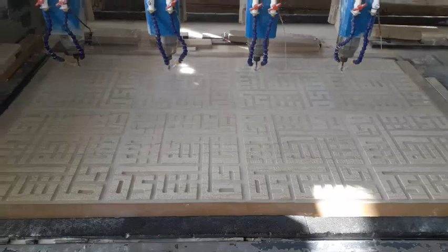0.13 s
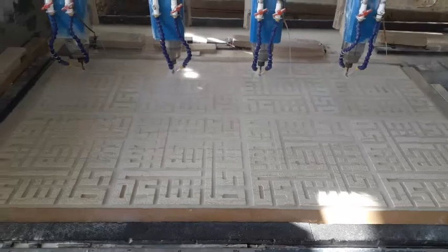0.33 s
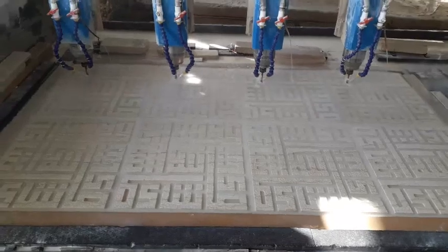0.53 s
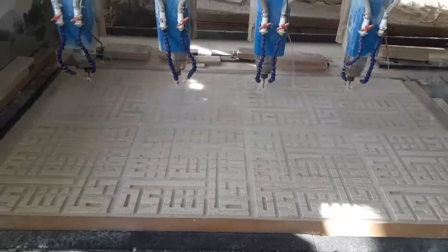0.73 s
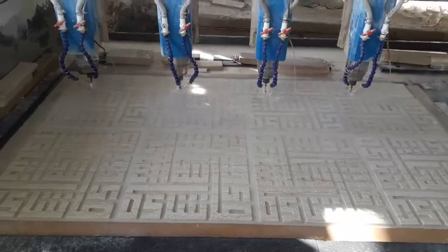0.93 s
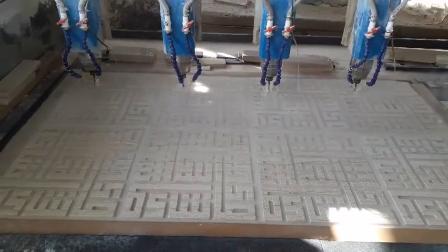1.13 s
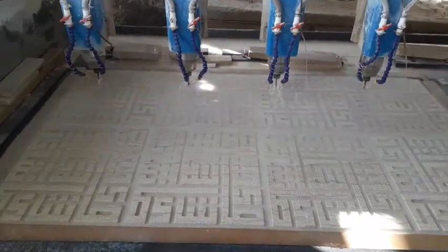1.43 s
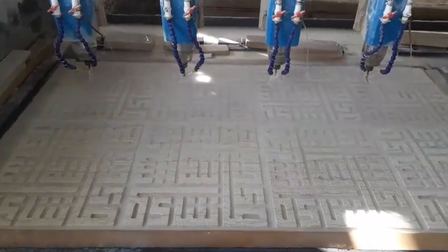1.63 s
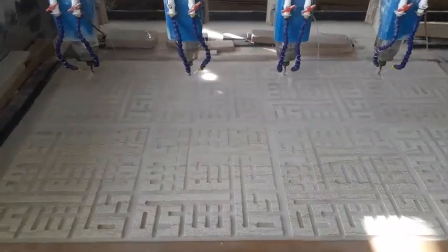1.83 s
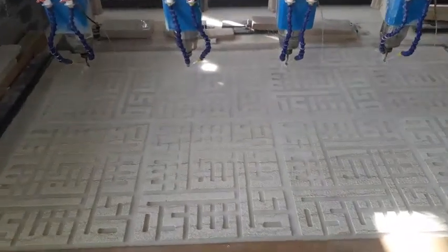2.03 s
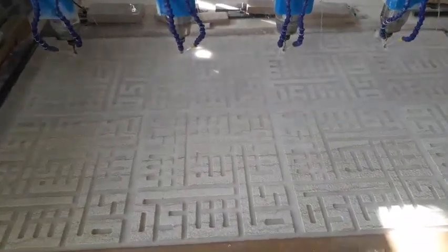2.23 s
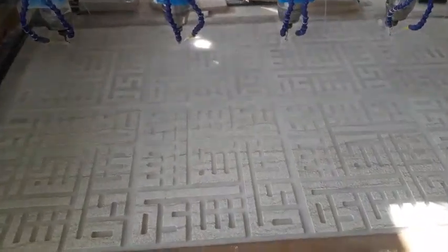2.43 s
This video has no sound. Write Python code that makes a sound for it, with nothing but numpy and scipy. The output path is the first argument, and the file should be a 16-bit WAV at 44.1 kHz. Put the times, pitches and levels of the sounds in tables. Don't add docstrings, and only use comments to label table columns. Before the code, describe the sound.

Router spindles carve stone in a workshop: three harsh grinding strokes with wavering whine and piercing ringing, separated by thinner, quieter spinning and a steady pump hum, captured nearby, abrupt at the start and with little deep bass.

```python
import sys
import numpy as np
from scipy import signal
from scipy.fft import rfft, irfft, next_fast_len
from scipy.io import wavfile
from scipy.ndimage import uniform_filter1d

SR = 44100
rng = np.random.default_rng(int(sys.argv[2]) if len(sys.argv) > 2 else 0)


def nominal_scale(level):
    x = np.asarray(level, float) / 20
    return 10 ** x


def generate_wav(signal):
    frames = np.transpose(np.atleast_2d(signal))
    scaled = np.clip(frames, -1, 1) * 32767
    pcm = np.round(scaled).astype(np.int16)
    wavfile.write(sys.argv[1], SR, pcm)


N = 114660
T = np.arange(N) / SR

SHAFT_RATES = [399.4, 401.6]


def evened(x):
    return x / np.sqrt(np.mean(abs(x) ** 2) + 1e-20)


def curve(rows, axis=1):
    rows = np.array(rows)
    return np.interp(T, rows[:, 0], rows[:, axis])


def read(points, hz):
    f, value = np.transpose(points)
    return np.interp(np.log(hz + 1), np.log(f + 1), value)


def slow(width_hz, count):
    size = next_fast_len(N // 16 + 2)
    hz = np.fft.fftfreq(size, 16 / SR)
    keep = abs(hz) < 150
    z = np.zeros((count, size), complex)
    noise = rng.standard_normal((count, keep.sum(), 2)) @ [1, 1j]
    z[:, keep] = noise / (1 + (hz[keep] * 2 / width_hz) ** 2)
    return evened(np.fft.ifft(z))


def waver(turns, z):
    at, grid = np.arange(N) / 16, np.arange(len(z))
    envelope = np.interp(at, grid, z)
    return np.sqrt(2) * (envelope * np.exp(2j * np.pi * turns)).real


def hiss(colour, patchy_db, flicker_db):
    frames, hz = N // 128 + 5, np.fft.rfftfreq(N, 1 / SR)
    a, b, patches = rng.standard_normal((frames, 257, 3)).T
    patches = uniform_filter1d(patches, size=6, axis=0)
    patches = evened(uniform_filter1d(patches, size=16, axis=1))
    flicker = evened(uniform_filter1d(rng.standard_normal(frames), size=3))
    spectra = (a + 1j * b) * nominal_scale(patchy_db * patches + flicker_db * flicker)
    x = signal.istft(spectra, nperseg=512, noverlap=384)[1][:N]
    return evened(irfft(rfft(x) * nominal_scale(read(colour, hz)), N))


def bell(s, length):
    return np.exp(-2 * ((T - s) / (0.71 * length)) ** 2)


def cutting_load():
    # t/s, level/dB
    effort = [(0.13, -12.5), (0.19, -13), (0.4, -13), (0.53, -14), (0.57, -19), (0.81, -20), (0.98, -14.5),
              (1.13, -17), (1.23, -14.5), (1.32, -16), (1.39, -16), (1.46, -22.5), (1.64, -19.5),
              (1.72, -19), (1.83, -15), (2.25, -14), (2.29, -20.5), (2.6, -17)]
    return curve(effort) + 15


def ridges_crossed():
    # t/s, f/Hz
    feed = [(.1, 53.3), (.3, 53), (.42, 57), (.55, 28), (.75, 20), (.87, 38), (.97, 58.4), (1.25, 66.8),
            (1.4, 26.9), (1.65, 30.6), (1.8, 55), (1.95, 58.7), (2.15, 57.2), (2.27, 24), (2.6, 20.7)]
    return np.cumsum(curve(feed)) / SR


def pump():
    # t/s, level/dB
    effort = [(0.13, -31.5), (0.15, -35), (1.12, -36), (1.2, -36.5), (1.83, -36.5), (1.97, -31),
              (2.19, -34.5), (2.33, -29), (2.6, -36)]
    # order, level/dB
    orders = [(1, 0.5), (2, -8.5), (3, -6.5), (4, -5.5)]
    pump_hz, rise_db = 252.5, 2.5
    z = 1 + 0.24 * slow(4, count=len(orders))
    rise = rise_db * (T / T[-1] - .5)
    hum = np.zeros(N)
    for (k, db), row in zip(orders, z):
        hum += nominal_scale(db + (k > 1.5) * rise) * waver(round(k) * pump_hz * T, row)
    return nominal_scale(curve(effort)) * hum


def machine_roar():
    # f/Hz, level/dB
    roar_colour = [(20, -49), (90, -17), (300, -7.5), (600, -14), (1400, -7), (2510, -9), (7270, -12.5),
                   (10000, -41)]
    return nominal_scale(-27 + 0.1 * cutting_load()) * hiss(roar_colour, patchy_db=2.1, flicker_db=0.0)


def treble_air():
    # f/Hz, level/dB
    air_colour = [(6000, -18), (10000, -2.5), (11000, -3.5), (12500, 3), (14000, -3.5), (15000, -2),
                  (15600, -4.5)]
    return nominal_scale(-35.5 + 0.87 * cutting_load()) * hiss(air_colour, patchy_db=-2, flicker_db=0.3)


def whine():
    # t/s, first order level/dB, second order level/dB
    low_beat = [(0.13, -28.5, -30.5), (0.18, -28.5, -37.5), (0.29, -28.5, -23.5), (0.41, -42, -37),
                (0.53, -29.5, -28.5), (1.03, -28, -29), (1.13, -28, -24.5), (1.28, -35, -35.5),
                (1.32, -49, -31.5), (1.42, -33.5, -26.5), (1.51, -30.5, -46), (1.78, -32, -18.5),
                (1.93, -26.5, -35), (2.08, -29, -19), (2.19, -31.5, -35.5), (2.25, -29, -24.5),
                (2.48, -28.5, -31.5), (2.6, -25, -19.5)]
    # t/s, third, fourth and fifth order level/dB
    upper_beat = [(0.13, -40, -23, -22.5), (0.19, -22, -31, -32), (0.25, -28, -29, -24),
                  (0.53, -25, -24, -40), (0.67, -33, -35, -31.5), (0.84, -21.5, -28.5, -34),
                  (0.99, -50, -31, -29), (1.09, -35, -30, -30), (1.26, -37, -32, -38),
                  (1.28, -33, -30, -28), (1.37, -31, -28, -29), (1.46, -32.5, -43, -30),
                  (1.65, -33.5, -26, -47), (2.12, -26.5, -42, -39), (2.23, -17, -31, -28),
                  (2.33, -36, -31, -32.5), (2.56, -22.5, -26, -36), (2.6, -24, -42, -35)]
    # order, level/dB
    free_orders = [(6, -51), (9, -36), (14, -54), (16, -60), (17, -32), (18, -39), (19, -42), (21, -72),
                   (23, -59)]
    mean_hz = np.mean(SHAFT_RATES)
    levels = [curve(low_beat, axis=k) for k in (1, 2)]
    levels += [curve(upper_beat, axis=k) for k in (1, 2, 3)]
    drift = 1 + np.array([[.08], [.2], [.35], [.45], [.6]]) * slow(14, count=5)
    low = np.zeros(N)
    for k, db in enumerate(levels, start=1):
        low += nominal_scale(db) * waver(k * mean_hz * T, drift[k - 1])
    z, top = slow(14, count=2 * len(free_orders)), np.zeros(N)
    for i, (order, db) in enumerate(free_orders + free_orders):
        shaft_hz = SHAFT_RATES[i // len(free_orders)]
        top += nominal_scale(db - 2.0) * waver(round(order) * shaft_hz * T, z[i])
    return low + top * nominal_scale(0.1 * cutting_load())


def chatter_squeals():
    # centre t/s, length t/s, f/Hz, level/dB
    squeals = [(0.14, 0.05, 2734, -23), (0.15, 0.06, 5868, -22), (0.17, 0.11, 4310, -26),
               (0.2, 0.07, 2352, -26), (0.2, 0.1, 1555, -14), (0.24, 0.05, 7445, -17),
               (0.33, 0.05, 5391, -25), (0.36, 0.1, 2289, -25), (0.4, 0.1, 7397, -17),
               (0.46, 0.11, 4766, -26), (0.52, 0.07, 1565, -15), (0.54, 0.07, 1172, -17),
               (0.97, 0.09, 4281, -27), (0.97, 0.13, 1539, -13.5), (0.98, 0.1, 7368, -18),
               (1.22, 0.12, 2318, -25), (1.23, 0.09, 1536, -16), (1.38, 0.08, 1176, -18),
               (1.83, 0.1, 5075, -26), (1.84, 0.15, 3138, -25), (1.85, 0.07, 6273, -26),
               (1.97, 0.05, 3138, -26), (2.1, 0.05, 7372, -20), (2.12, 0.15, 5372, -26),
               (2.16, 0.07, 3083, -25), (2.16, 0.1, 2293, -25), (2.22, 0.1, 1576, -15),
               (2.24, 0.1, 1190, -19), (.6, .07, 1560, -21), (.33, .08, 1490, -22), (.43, .1, 1475, -24),
               (1.8, .1, 1545, -21), (1.38, .09, 1560, -22), (2.02, .07, 1530, -23), (1.13, .1, 1165, -26),
               (1.27, .09, 1112, -26), (1.26, .08, 1930, -23), (.93, .16, 2335, -28),
               (1.85, .08, 2350, -26), (.25, .14, 3130, -27), (.45, .06, 3120, -27), (.95, .08, 3130, -27),
               (1.15, .1, 3140, -29), (2.05, .07, 3130, -29), (.46, .08, 7450, -17), (.86, .1, 7480, -23),
               (1.06, .1, 7480, -21), (1.35, .07, 7485, -19),
               (.76, .14, 7580, -24), (.75, .12, 7190, -26), (1.1, .22, 1940, -26), (1.4, .14, 1950, -26),
             (1.62, .1, 1157, -25), (1.64, .12, 7150, -25), (1.6, .07, 7550, -25), (1.9, .2, 2735, -29),
             (1.92, .15, 7080, -25), (2.15, .25, 1990, -27), (2.35, .12, 6830, -25), (2.5, .25, 7185, -26),
             (2.5, .2, 3610, -34), (1.57, .07, 4000, -30), (1.42, .08, 4760, -29), (1.76, .08, 3533, -28),
             (2.24, .07, 5797, -26), (1.47, .08, 1975, -26), (.3, .14, 1585, -21), (1.8, .1, 770, -28),
             (1.95, .1, 7510, -23), (1.7, .1, 7540, -27), (2.45, .12, 6430, -31), (.41, .08, 1190, -21),
             (2.16, .07, 1585, -19), (.9, .08, 2740, -28), (2.28, .08, 650, -32)]
    swells = squeals
    trim_db = -.6
    depth = np.array(swells)[:, 2:3] ** .5 / 190
    z = 1 + depth * slow(45, count=len(swells))
    tones = np.zeros(N)
    for (s, length, hz, db), row in zip(swells, z):
        tones += nominal_scale(db + trim_db) * bell(s, length) * waver(hz * T, row)
    return tones


def stroke_end_grinds():
    # centre t/s, length t/s, level/dB
    grind_swells = [
        (0.508, 0.38, -24),
        (1.39, 0.18, -23),
        (2.25, 0.2, -21),
    ]
    # f/Hz, level/dB
    grind_colour = [(500, -35), (900, -2.5), (1300, 2), (1900, 0.5), (2600, -7), (5000, -1.5), (9000, -24)]
    envelope = sum(nominal_scale(db) * bell(s, length) for s, length, db in grind_swells)
    return hiss(grind_colour, patchy_db=3.5, flicker_db=-4.5) * envelope


def moving_ring():
    # t/s, f/Hz
    ring_path = [(.13, 7390), (.55, 7433), (.75, 7560), (.95, 7380), (1.35, 7480), (1.6, 7500),
                 (1.85, 7450), (1.97, 7260), (2.2, 7460), (2.6, 7296)]
    width_hz, ring_db, clump_db = 330, -21, 3
    r = np.exp(-np.pi * width_hz / SR)
    noise = rng.standard_normal((N, 2)) @ [1, 1j]
    z = signal.lfilter([1], np.convolve([1, -r], [1, -r]), noise)
    clumps = np.repeat(slow(10, count=1)[0].real, repeats=16)[:N]
    turn = np.exp(2j * np.pi * np.cumsum(curve(ring_path)) / SR)
    return evened((z * turn).real) * nominal_scale(ring_db + clump_db * clumps)


def grit():
    # f/Hz, width f/Hz, level/dB
    bit_modes = [(7500, 440, -26.5), (7000, 160, -30.5), (9096, 350, -34.5), (8260, 330, -39.5)]
    # f/Hz, level/dB
    dust_colour = [(350, -52), (700, -11), (1160, -5.5), (1600, -17.5), (2800, -11), (4500, -1.5),
                   (7200, -12), (10000, -30)]
    dust_db, buzz = -22, 0.63
    hz = np.fft.rfftfreq(N, 1 / SR)
    ring = sum(nominal_scale(db) / np.sqrt(w) / (1 + ((hz - f) * 2 / w) ** 2) for f, w, db in bit_modes)
    drive = hiss([(20, 0), (20000, 0)], patchy_db=1.5, flicker_db=1.54)
    turns = SHAFT_RATES[0] * T - .25 * ridges_crossed()
    pulses = evened(1 - buzz + 3 * buzz * np.exp(-(turns % 1) / 0.23))
    dust = hiss(dust_colour, patchy_db=0.3, flicker_db=2.0) * pulses
    return nominal_scale(dust_db) * dust + irfft(rfft(drive) * ring * np.sqrt(SR / 1.6), N)


def side_tones():
    # f/Hz, level/dB
    cut_colour = [(800, -47), (1150, -34.5), (1550, -29.5), (2000, -32), (2400, -37), (6500, -36.5),
                  (7400, -37), (8600, -47)]
    split_per_order, split_spread, bloom_db = 0.14, 0.81, 4.5
    fuzz_hz, fuzz_db, sag_hz = 77, 2.5, 7
    swell_db, even_share, high_follow = .8, .6, 0.14
    ridges, load = ridges_crossed()[::16], cutting_load()[::16]
    shaft_hz, count = np.mean(SHAFT_RATES), len(ridges)
    bloom = nominal_scale(bloom_db * slow(4.6, count=23 * 6).real)
    z = evened(slow(24, count=23 * 6) * bloom)[:, :count]
    m = np.arange(1, 7)[:, None]
    fuzz = nominal_scale(fuzz_db) * slow(fuzz_hz, count=25)[:, :count]
    swell = nominal_scale(swell_db * np.sqrt(2) * slow(8.4, count=25).real)[:, :count]
    out = np.zeros(N)
    for k, rows in enumerate(z.reshape(23, 6, -1), start=2):
        spread = split_spread + 0.028 * k
        share = np.exp(-.5 * ((m - .5 - split_per_order * k) / spread) ** 2)
        split = (share * rows * np.exp(-2j * np.pi * m * ridges)).sum(axis=0)
        halo = fuzz[k] * np.exp(-2j * np.pi * (.6 + sag_hz * k / 55) * ridges)
        both = split + halo
        power = uniform_filter1d(abs(both) ** 2, size=200)
        both = both * (power.mean() / power) ** (even_share / 2)
        both = both * nominal_scale(high_follow * (min(k, 8) - 3) * load)
        out += nominal_scale(read(cut_colour, k * shaft_hz)) * waver(k * shaft_hz * T, both * swell[k])
    return out


def scene():
    load = cutting_load()
    background = pump() + machine_roar() + treble_air()
    spindles = whine() + chatter_squeals() + stroke_end_grinds()
    cut = nominal_scale(1.5 * load) * moving_ring() + nominal_scale(1.03 * load) * grit() + nominal_scale(0.8 * load) * side_tones()
    return np.tile(background + spindles + cut, (2, 1))


def low_pass(x):
    return signal.sosfilt(signal.butter(12, 16040, fs=SR, output="sos"), x)


def record(dry):
    edge_hz, low_hz = 15520, 80
    start_s, open_s = .1189, .0002
    x = np.clip(dry, -.9, .9)
    hz = np.fft.rfftfreq(N, 1 / SR)
    response = (hz < edge_hz) / np.sqrt(1 + (low_hz / (hz + 1)) ** 4)
    x = irfft(rfft(x) * response, N)
    return low_pass(x * np.clip((T - start_s) / open_s, 0, 1))


dry = scene()
out = record(dry)
generate_wav(out)
```